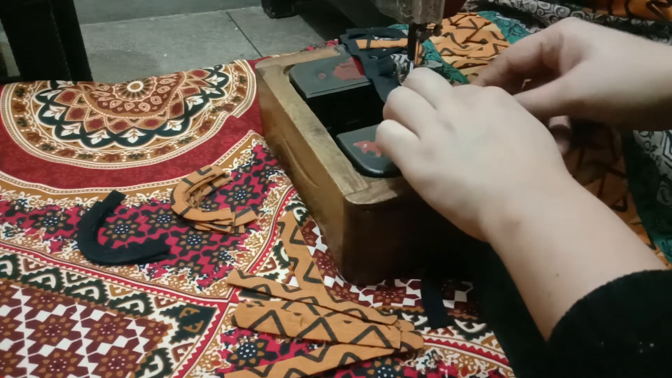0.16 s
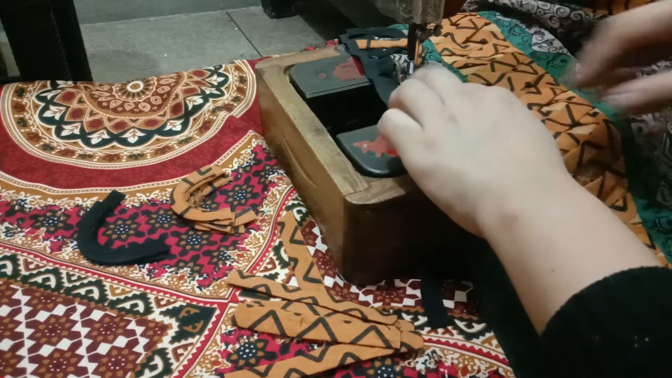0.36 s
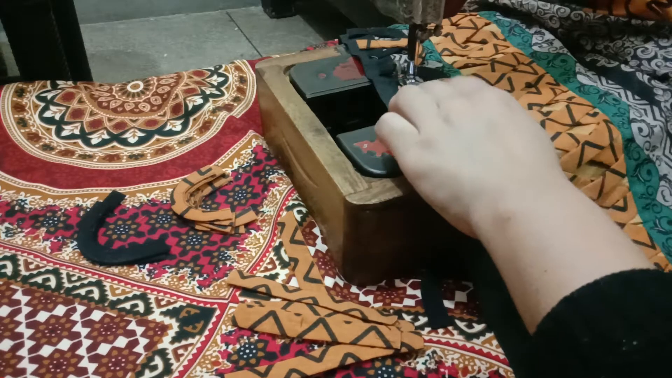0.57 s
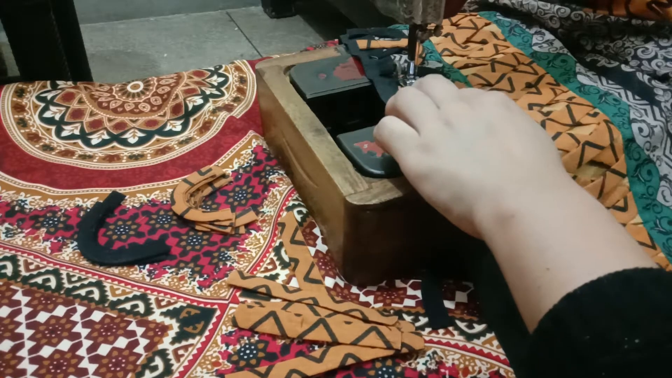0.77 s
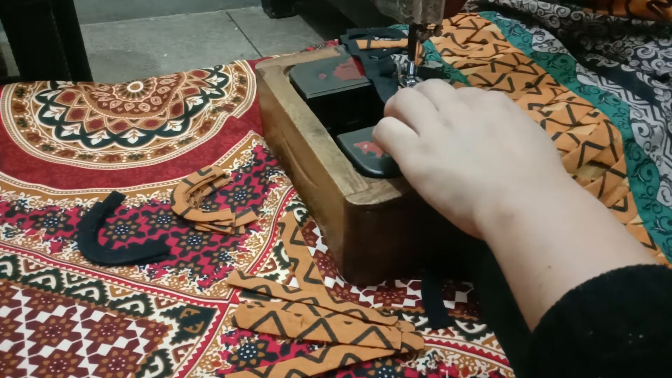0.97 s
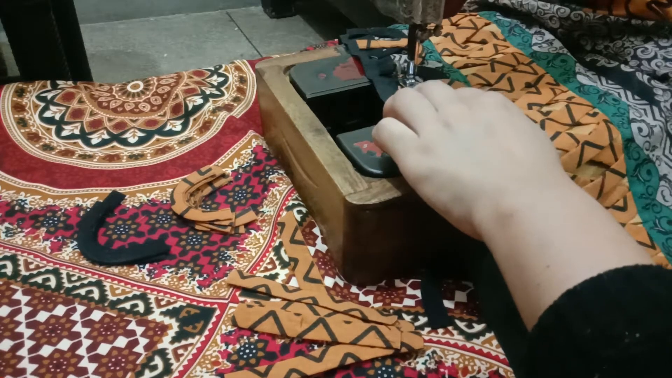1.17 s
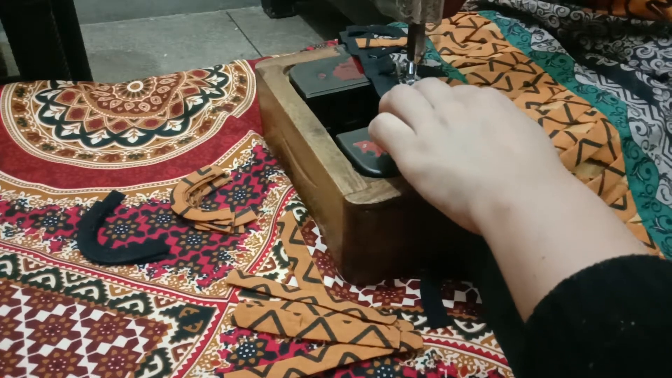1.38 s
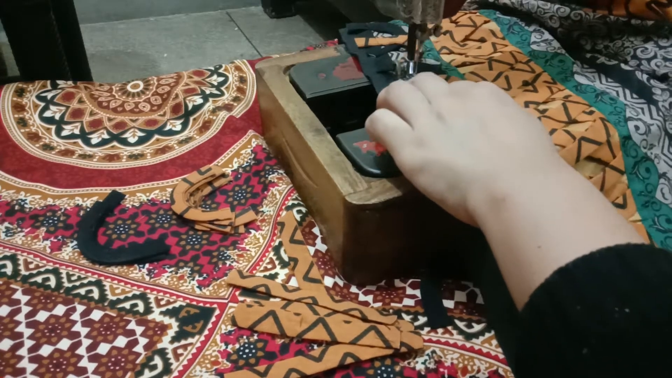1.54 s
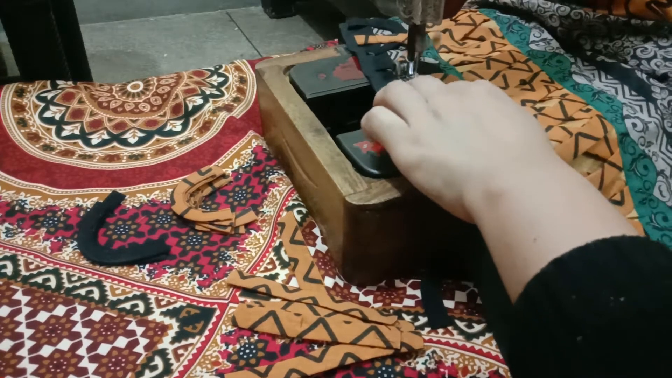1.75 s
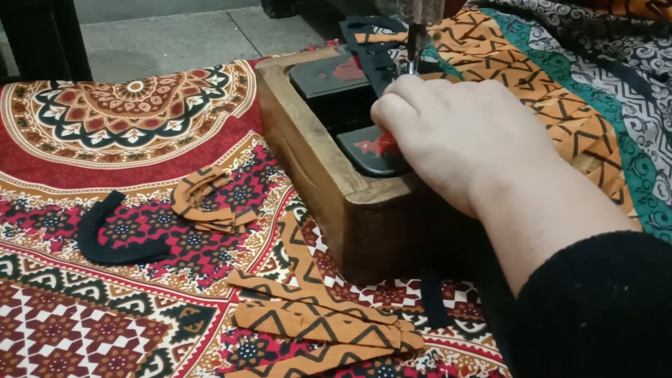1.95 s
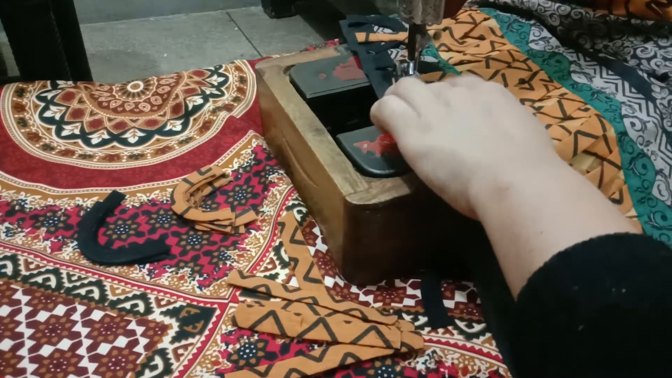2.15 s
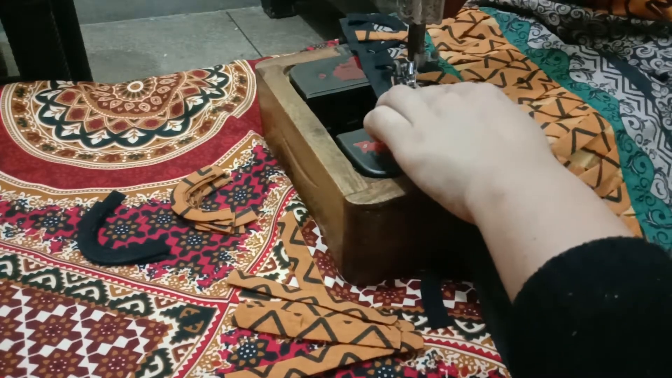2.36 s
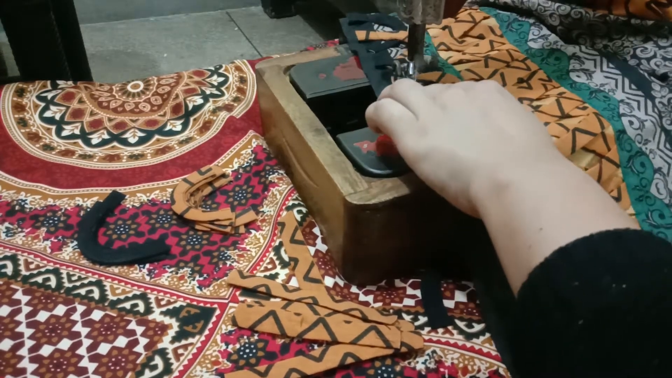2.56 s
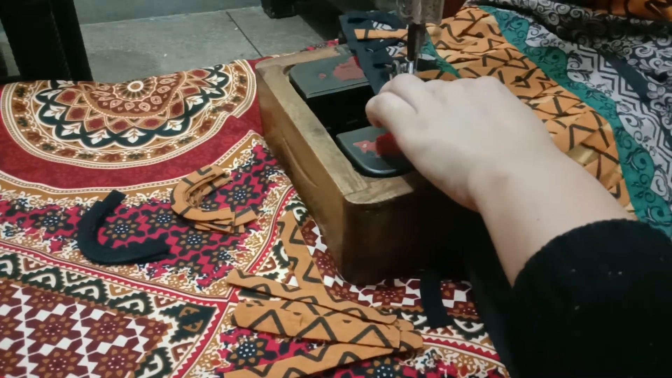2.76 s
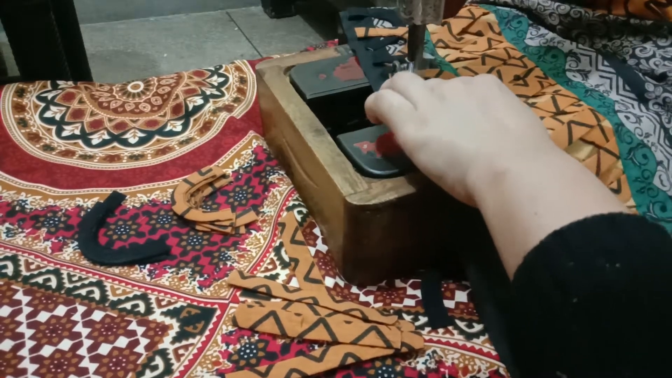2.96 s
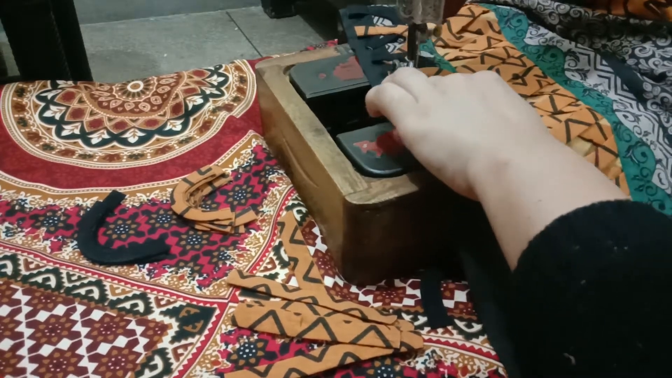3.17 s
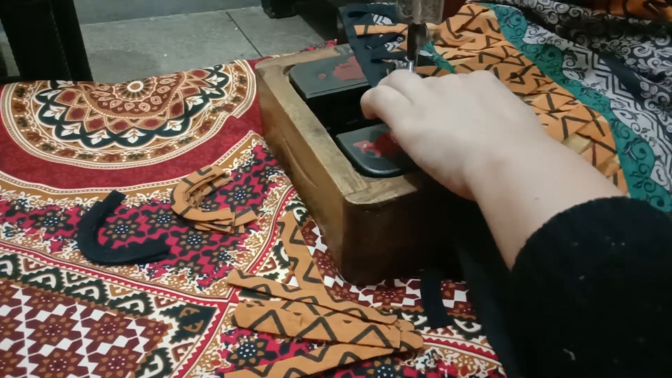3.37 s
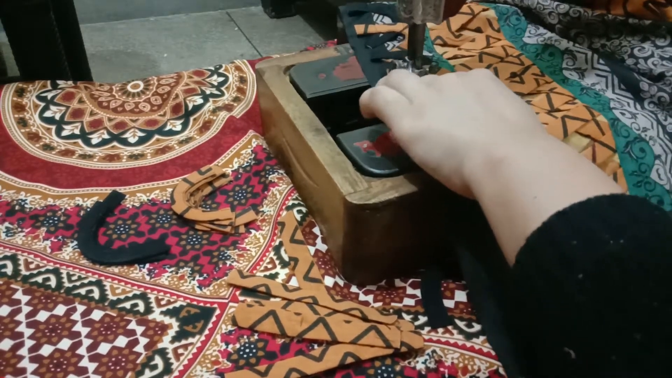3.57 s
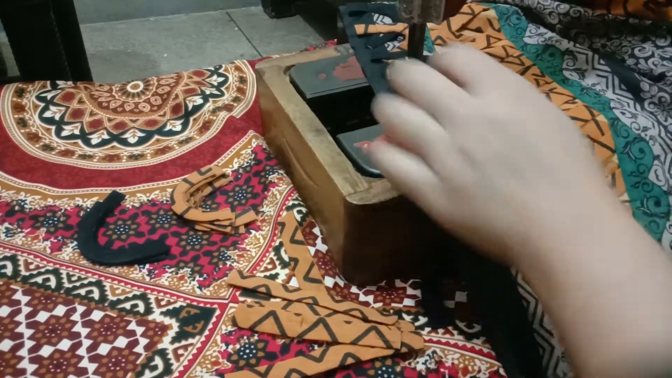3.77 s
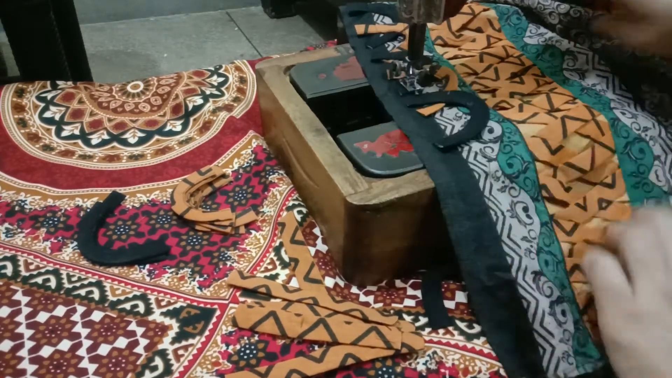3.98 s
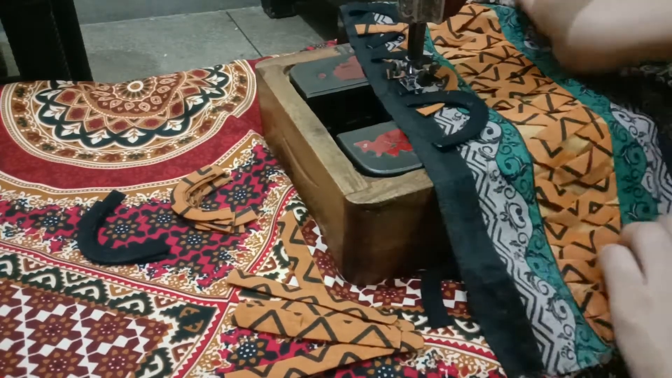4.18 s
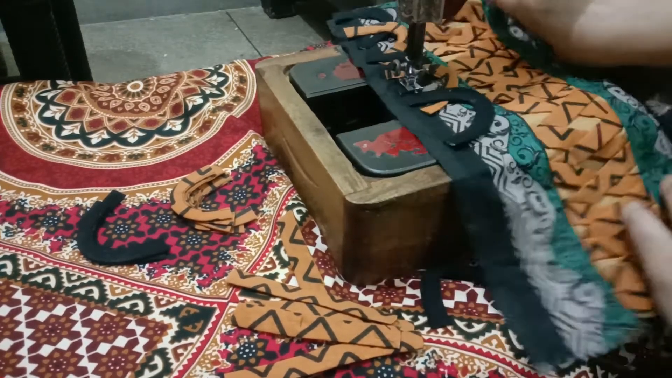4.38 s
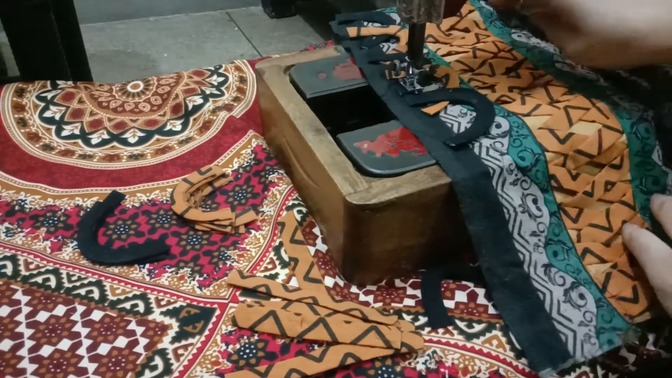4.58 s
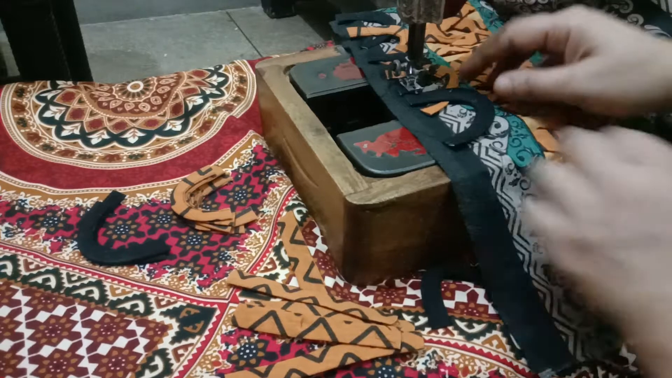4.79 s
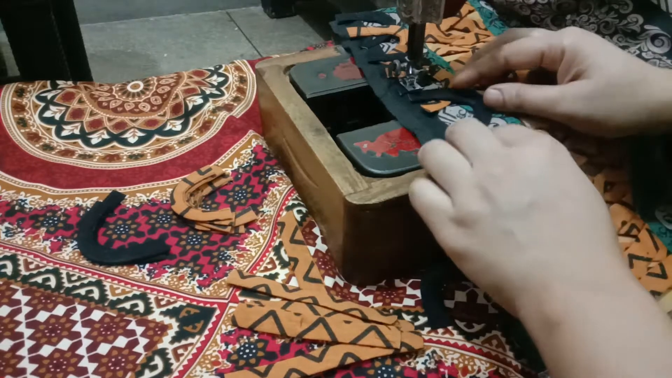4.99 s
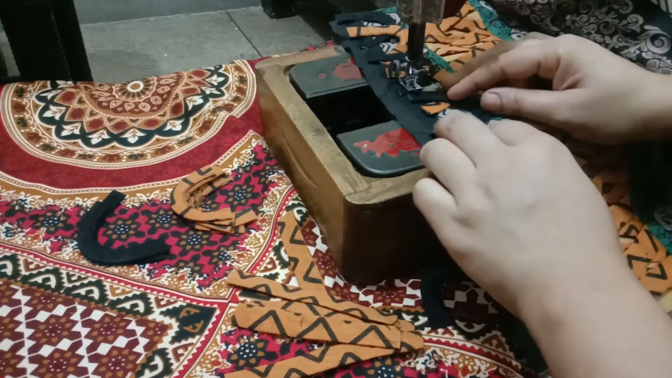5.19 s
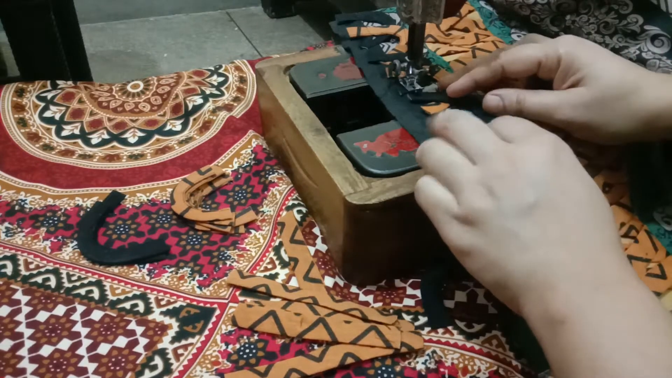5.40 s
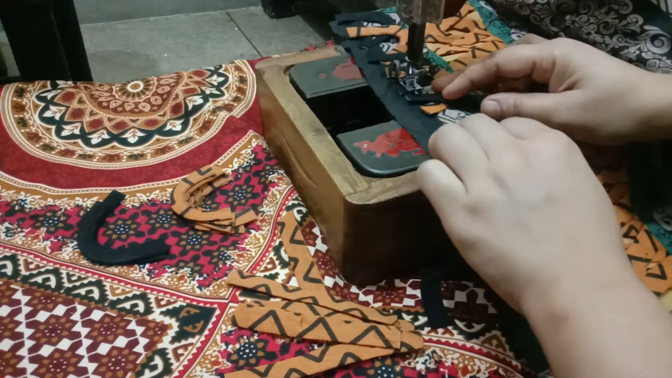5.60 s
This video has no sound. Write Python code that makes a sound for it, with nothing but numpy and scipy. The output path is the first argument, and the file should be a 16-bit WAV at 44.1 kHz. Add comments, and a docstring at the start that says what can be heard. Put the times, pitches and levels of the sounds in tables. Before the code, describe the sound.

Close, dry, nearly mono indoor sound. Quiet hiss and low rumble first, with muffled fabric movement and two quick clicks. A rubbery squeak starts the sewing machine; its rhythmic clacks quicken, slow, then quicken again after a raspy second push, with soft table thumps. After it stops, fabric is pulled with crisp rustles and scattered clicks, one sharp tap near the end, and a very faint far horn and engine hum behind.

```python
"""In a rumbling room with a far horn, an old cast-iron sewing machine stands close to a phone microphone.
Hands rustle cloth (noise and clicks) and tap the machine (short bursts) before and after the run.
A hand pushes the wheel twice, the palm squeaking on the rim (fluttering partials and rasping noise);
the machine runs up, stitches and coasts. Gritty sliding (shaken modes) lies under linkage ticks,
knocks in the wooden base and soft table thumps (struck modes)."""
import sys
import numpy as np
from scipy import signal
from scipy.fft import rfft, irfft, next_fast_len
from scipy.io import wavfile
from scipy.ndimage import uniform_filter1d

SR = 44100
rng = np.random.default_rng(int(sys.argv[2]) if len(sys.argv) > 2 else 0)


def to_wav(sig):
    """Store sig (one row per channel, or 1-D mono) as 16-bit WAV at the path in sys.argv[1].

    Samples outside -1..1 are clipped; the rate is SR.
    """
    pcm = np.clip(np.atleast_2d(sig), -1, 1) * 32767
    pcm = np.round(pcm).astype(np.int16)
    wavfile.write(sys.argv[1], SR, pcm.T)  # frames by channels


N = 248724


def undb(db):
    """Gain of a dB value."""
    return 10 ** (np.asarray(db) / 20)


def unit(x):
    """Scale to rms 1."""
    return x / np.sqrt(np.mean(x ** 2))


def noise():
    """White noise."""
    return rng.standard_normal(N)


def track(rows, column):
    """One column of a curve at every sample."""
    rows = np.array(rows)
    return np.interp(np.arange(N) / SR, rows[:, 0], rows[:, column])


def gain(rows, column, fade_s=0.0025):
    """A dB column as gain, faded at both ends and silent outside its span."""
    t = np.arange(N) / SR
    edge = np.minimum(t - rows[0][0], rows[-1][0] - t) / fade_s
    return undb(track(rows, column)) * np.clip(edge, 0, 1)


def shade(points, hz):
    """Gain of a (f/Hz, level/dB) spectrum at given frequencies."""
    points = np.array(points)
    return undb(np.interp(np.log(hz + 1), np.log(points[:, 0]), points[:, 1]))


def filtered(x, points):
    """Weight the spectrum of x by a (f/Hz, level/dB) curve."""
    size = next_fast_len(N)
    hz = np.arange(size // 2 + 1) * SR / size
    return irfft(rfft(x, size) * shade(points, hz), size)[:N]


def colour(x, points):
    """Give x a spectrum, at rms 1."""
    return unit(filtered(x, points))


def band(x, hz, width):
    """One resonance of a given width in Hz."""
    return signal.lfilter(*signal.iirpeak(hz, hz / width, SR), x)


def high(x, hz):
    """Take away what lies below hz."""
    return signal.sosfilt(signal.butter(2, hz, "high", fs=SR, output="sos"), x)


def ring(x, modes, damping):
    """Drive a set of decaying modes; damping divides their listed decay times."""
    out = 0
    for hz, db, t60 in modes:
        pole = np.exp((2j * np.pi * hz - np.log(1000) * damping / t60) / SR)
        out = out + undb(db) * signal.lfilter([1], [1, -pole], x).imag
    return out


def grit(rate, spread_db):
    """Random clicks, rate per second, whose sizes have a long tail."""
    clicks = (rng.random(N) < rate / SR) * noise()
    return unit(clicks * undb(spread_db * np.minimum(rng.exponential(size=N), 3)))


def walk(rate):
    """Random levels, rate per second, slewed from one to the next; spread 1."""
    k = int(SR / rate)
    held = np.repeat(rng.standard_normal(N // k + 1), k)
    return unit(uniform_filter1d(held, k)[:N])


def burst(t60, rise_s, size=8192):
    """A puff of noise that rises and dies."""
    t = np.arange(size) / SR
    return rng.standard_normal(size) * np.minimum(t / rise_s, 1) * 1000. ** (-t / t60)


def add(out, s, x, db):
    """Lay x into out at s with peak db."""
    i = int(s * SR)
    x = x[:N - i]
    out[i:i + len(x)] += x * undb(db) / np.abs(x).max()


def shaken(x, modes, damping, patchy_db, rate):
    """Contact points wander, so each mode swells and fades alone."""
    return unit(sum(undb(patchy_db * walk(rate)) * ring(x, [mode], damping) for mode in modes))


# wheel speed: [t/s, stitches per s]
WHEEL_SPEED = [(1.16, 1.1), (1.195, 3.5), (1.3, 4.77), (1.54, 6.87), (1.88, 4.31), (2.36, 3.04),
               (2.49, 1.6), (2.51, 3.5), (2.69, 5.3), (2.89, 8.45), (3.15, 6), (3.44, 4.17), (3.57, 1.9),
               (3.64, 0.16)]
# the hand drives the wheel: [grip t/s, release t/s]
HAND_PUSHES = [(1.19, 1.43), (2.54, 2.82)]
USUAL_SPEED = 6  # stitches per s, where speed adds nothing to a part's level
PUSH_FADE_S = 0.07  # the load comes and goes
AFTER_RISE_S, AFTER_FALL_S = 0.008, 0.085  # time constants of the shaking after a knock


def gear(law):
    """Gain of a running part: it grows with speed, changes under the hand and after each knock."""
    db, speed_db, push_db, after_db = law
    t = np.arange(N) / SR
    push = sum(np.clip(np.minimum(t - a, b - t) / PUSH_FADE_S + 0.5, 0, 1) for a, b in HAND_PUSHES)
    times = np.array(BASE_KNOCKS)[:, 0]
    latest = np.maximum(np.searchsorted(times, t) - 1, 0)
    since = np.maximum(t - times[latest], 0)
    after = (1 - np.exp(-since / AFTER_RISE_S)) * np.exp(-since / AFTER_FALL_S)
    turning = (t > WHEEL_SPEED[0][0]) & (t < WHEEL_SPEED[-1][0])
    doublings = np.log2(track(WHEEL_SPEED, 1) / USUAL_SPEED)
    return turning * undb(db + speed_db * doublings + push_db * push + after_db * after)


# hiss of the room: [f/Hz, level per Hz/dB]
ROOM_SPECTRUM = [(25, -30.5), (60, -30), (200, -24), (300, -22.5), (600, -30.5), (1200, -35.5), (2500, -39),
                 (4500, -42), (9000, -51.5), (13000, -51.5), (15600, -47)]
# low room rumble over time: [t/s, level/dB]
RUMBLE_LEVEL = [(0.0, -59.5), (0.25, -53.5), (0.4, -61), (1.1, -62.5), (3.6, -62.5), (4.05, -59),
                (4.27, -63.5), (4.5, -55.5), (4.8, -59.5)]
# two bands of the rumble: [f/Hz, width/Hz, relative level/dB]
RUMBLE_SHAPE = [(118.6, 20, 2), (165.5, 20, -4.5)]
# machine shaking the table: [level/dB, per speed doubling/dB, under the hand/dB, after a knock/dB]
TABLE_SHAKE = (-52.5, 13.5, -2.5, 15.5)
# deepest band, its own part without the share of the rumble: [f/Hz, width/Hz, level/dB]
DEEP_DRONE = (75.5, 24, -63)
# faint whines: [f/Hz, width/Hz, level/dB]
WHINES = [(1243, 45, -78), (5850, 85, -83.5)]
# far horn: [start t/s, end t/s, fundamental f/Hz, level/dB, highest multiple]
FAR_HORN = [(.51, .95, 409, -74, 10), (3.75, 3.95, 484, -74, 7)]
# resonances of the horn's bell: [f/Hz, level/dB]
HORN_BELL_SPECTRUM = [(2500, -30), (2860, -2), (3250, 1), (3690, 2), (4090, -4), (4300, -30)]
# a far engine: [f/Hz, level/dB]
ENGINE_HUM = (111, -47.5)
# its span: [start t/s, end t/s]
ENGINE_SPAN = (4.32, 4.74)


def far_horn():
    """Harmonics from the sixth up flutter separately under the bell's resonances."""
    t = np.arange(N) / SR
    out = np.zeros(N)
    for a, b, hz, db, top in FAR_HORN:
        swell = gain([(a, db), (b, db)], 1, fade_s=0.042)
        for k in range(6, top + 1):
            flutter = undb(3 * walk(80))
            out += swell * shade(HORN_BELL_SPECTRUM, k * hz) * flutter * np.sin(2 * np.pi * k * hz * t)
    return out


def far_engine():
    """A far engine hums for a moment, wavering in pitch and level."""
    (a, b), (hz, db) = ENGINE_SPAN, ENGINE_HUM
    phase = 2 * np.pi * np.cumsum(hz * (1 + 0.0257 * walk(8.0))) / SR
    return gain([(a, db), (b, db)], 1, fade_s=0.022) * undb(1.3 * walk(9.7)) * np.sin(phase)


def room():
    """Filtered noise makes hiss, rumble, a drone and two faint whines, with a far hum and horn."""
    hiss = undb(-68 + 0.75 * walk(11.0)) * colour(noise(), ROOM_SPECTRUM)
    low = unit(sum(undb(db) * unit(band(band(noise(), hz, w), hz, w)) for hz, w, db in RUMBLE_SHAPE))
    whine = sum(undb(db) * unit(band(noise(), hz, w)) for hz, w, db in WHINES)
    # the running machine shakes the table, which adds to the rumble
    rumble = undb(track(RUMBLE_LEVEL, 1) + 0.5 * walk(10.0)) + gear(TABLE_SHAKE)
    hz, width, db = DEEP_DRONE
    deep = unit(high(band(band(noise(), hz, width), hz, width), 58))
    drone = (undb(db + 2.0 * walk(2.1)) + undb(-15.5) * rumble) * deep
    return hiss + rumble * low + drone + whine + far_horn() + far_engine()


# cloth pulled: [loudest t/s, rise/s, fall/s, bright level/dB, dull level/dB, fizz level/dB]
CLOTH_PULLS = [(0.268, 0.045, 0.053, -76, -60.5, -61.5), (0.37, 0.054, 0.041, -89, -61, -88),
               (4.041, 0.038, 0.15, -57.5, -61.5, -65.5), (4.27, 0.015, 0.15, -51, -60, -60),
               (4.335, 0.043, 0.11, -47.5, -55.5, -58), (4.48, 0.039, 0.066, -59, -55, -65),
               (5.601, 0.097, 0.13, -84, -62, -76)]
# bright part of the cloth: [f/Hz, level per Hz/dB]
CLOTH_SPECTRUM = [(710, -53), (1200, -35), (1250, 12.5), (1600, 1), (2800, 8.5), (5630, 3.5), (11900, -10),
                  (15600, -0.5)]
CLOTH_EDGE_DB = -19.5  # ends of the rise and the fall, against the peak


def pull(s, rise_s, fall_s, db):
    """Gain of one pull on the cloth: up to a peak and down again."""
    edge_db = db + CLOTH_EDGE_DB
    return gain([(s - rise_s, edge_db), (s, db), (s + fall_s, edge_db)], 1)


def cloth():
    """Cloth fibres crackle: clicks over noise in bright, dull and fizzing bands."""
    fibres = grit(800, 1.9) + 1.5 * noise()
    bright = high(colour(fibres, CLOTH_SPECTRUM), 740) * undb(3.3 * walk(50))
    fizz = unit(band(band(fibres, 6540, 1600), 5800, 2300))
    dull = unit(high(band(grit(300, 1.1) + 0.5 * noise(), 334, 107), 180))
    out = np.zeros(N)
    for s, rise, fall, bright_db, dull_db, fizz_db in CLOTH_PULLS:
        rustle = undb(bright_db) * bright + undb(dull_db) * dull + undb(fizz_db) * fizz
        out += pull(s, rise, fall, 0) * rustle
    return out


# finger taps: [t/s, level/dB, centre f/Hz, width as share of centre, low part level/dB,
# tail against the tap/dB]
FINGER_TAPS = [(0.7998, -33.5, 5800, 0.21, -52, -5), (0.8133, -32, 5700, 0.22, -44, -13),
               (4.0269, -62, 6100, .4, -38.5, 0), (4.0799, -44, 5700, 0.4, -43, -13),
               (4.1334, -48, 3000, .6, -77, -4), (4.1804, -41.5, 2640, 0.19, -50, -10.5),
               (4.2565, -29.5, 6060, 0.41, -38, -16), (4.29, -41, 6000, .3, -56, -14),
               (4.3153, -33, 4020, 1, -52, -13), (4.338, -37, 5200, 0.65, -60, -20),
               (4.348, -39, 6000, .9, -58, -23), (4.363, -42, 4500, 1, -58, -23),
               (4.793, -56, 6400, 0.24, -76, -0.5), (4.967, -52.5, 4500, 0.91, -75, -20),
               (5.0057, -44, 6300, .5, -71, -18), (5.2632, -41.5, 5000, 0.36, -54, -13.5),
               (5.2913, -26.5, 4450, .9, -32, -31), (5.542, -52, 5100, .5, -68, -13),
               (5.607, -51, 5800, 0.27, -70, -15)]
# presser foot, bar and plate: [f/Hz, level/dB, decay before damping/s]
PRESSER_MODES = [(423, 2, 0.1), (860, 9.5, 0.023), (1296, 7.5, 0.058), (1830, -1, 0.044),
                 (3010, 6.5, 0.019), (3540, 10.5, 0.014), (5450, -2, .05), (6430, -1, 0.047)]


def taps():
    """A fingertip snaps on the machine, then loose parts rattle the presser's modes."""
    out = np.zeros(N)
    for s, db, hz, share, low_db, tail_db in FINGER_TAPS:
        width = share * hz
        snap = burst(0.012, 0.00028)
        contact = unit(band(band(snap, hz, width), hz, 0.98 * width))
        metal = unit(high(ring(snap, PRESSER_MODES[4:], damping=2.2), 2400))
        add(out, s, contact + 0.42 * metal, db)
        add(out, s, high(ring(burst(0.031, 0.0001), PRESSER_MODES[:3], damping=6.0), 360), low_db)
        # the rattle jumps in level every 128 samples
        rattle = burst(0.26, 0.002) * undb(2.0 * np.repeat(rng.standard_normal(64), 128))
        ringing = unit(band(ring(rattle, PRESSER_MODES[2:], damping=1.8), hz, hz))
        tail = ringing + 0.6 * unit(band(rattle, hz, width))
        add(out, s, high(tail, 430), db + tail_db)
        # the lower modes and the room answer the low part
        answer = burst(0.19, 0.013)
        modes = unit(ring(answer, PRESSER_MODES[:5], damping=2.2))
        around = unit(band(band(answer, 1280, 1900), 1240, 2400))
        add(out, s + 0.004, high(modes + 1.16 * around, 330), low_db - 8.5)
    return out


# palm on the rim, one list a squeak: [t/s, slip rate f/Hz, whistle level/dB, rasp level/dB,
# further level of partials above the second/dB]
PALM_SQUEAKS = [
    [(1.061, 1565, -50, -42, -12), (1.072, 1562, -46.5, -44.5, -8), (1.09, 1593, -38.5, -47, -1.5),
     (1.1, 1625, -42, -48, -10), (1.113, 1576, -40, -41, -10), (1.122, 1604, -54, -37, -8),
     (1.225, 1555, -64, -45.5, -6)],
    [(2.404, 1440, -68, -45, -8), (2.434, 1457, -57, -45, -3), (2.447, 1517, -52, -43.5, -1.5),
     (2.468, 1513, -46.5, -52, -2.5), (2.476, 1496, -50, -38.5, -6), (2.49, 1515, -56, -41.5, -2),
     (2.55, 1506, -62, -45, -3)],
]
# response of the wheel rim: [f/Hz, level/dB]
RIM_SPECTRUM = [(1600, -1), (3200, 1), (4570, -3), (4780, 14), (6060, 5), (6370, 4), (7560, 11),
                (7970, -11), (9060, 2), (10600, 3), (11150, -20), (12100, 7), (12750, -18), (13600, -3)]
# rough rubbing: [f/Hz, level per Hz/dB]
RASP_SPECTRUM = [(710, -72), (1200, -7.5), (3270, -15), (6110, 0.5), (8480, -10), (15000, -17.5)]
# slips locked onto one wheel mode: [start t/s, end t/s, start f/Hz, end f/Hz, level/dB]
WHEEL_LOCKS = [(1.091, 1.103, 4960, 5120, -29), (1.112, 1.148, 5160, 5000, -39.5),
               (1.11, 1.219, 6390, 6170, -43), (1.127, 1.218, 7500, 7750, -48),
               (2.403, 2.434, 5700, 5580, -43), (2.471, 2.487, 5600, 5720, -43)]


def squeaks():
    """Stick-slip: regular slips whistle in partials or lock onto a wheel mode; broken slips rasp."""
    out = np.zeros(N)
    for rows in PALM_SQUEAKS:
        hz = track(rows, 1) * (1 + 0.00516 * walk(300))
        phase = 2 * np.pi * np.cumsum(hz) / SR
        upper_db = track(rows, 4)
        stack = np.zeros(N)
        for k in range(1, 10):
            flutter = undb(0.64 * k * walk(90) + (k > 2) * upper_db)
            stack += shade(RIM_SPECTRUM, k * hz) * flutter * np.sin(k * phase + k * k)
        rasp = high(colour(noise() * (1 + 0.5 * np.cos(phase)), RASP_SPECTRUM), 1100)
        out += gain(rows, 2, fade_s=0.0016) * stack + gain(rows, 3, fade_s=0.0041) * rasp
    for a, b, hz, end_hz, db in WHEEL_LOCKS:
        glide = track([(a, hz), (b, end_hz)], 1) * (1 + 0.00397 * walk(300))
        tone = np.sin(2 * np.pi * np.cumsum(glide) / SR)
        out += gain([(a, db), (b, db)], 1) * undb(3.3 * walk(120)) * tone
    return out


# wooden base: [f/Hz, level/dB, decay before damping/s]
BASE_MODES = [(135.7, -9, .15), (342, 9.5, 0.074), (533, 13, 0.034), (681, 2.5, 0.065), (1117, -9, 0.039),
              (1217, 3, 0.043), (1930, -19, 0.083)]
# cast iron: [f/Hz, level/dB, decay before damping/s]
IRON_MODES = [(2340, 6, 0.015), (3215, -17, 0.093), (4805, -8, 0.016), (5630, -3, 0.014), (6305, -3, 0.042),
              (6765, 4, 0.021), (7230, -5, 0.053)]
# needle plate: [f/Hz, level/dB, decay before damping/s]
PLATE_MODES = [(2204, -3, 0.1), (2512, 4, 0.0583), (2564, 1.5, 0.15)]
# sliding hiss: [f/Hz, level per Hz/dB]
SLIDE_SPECTRUM = [(880, -2), (1500, -10.5), (2750, -1.5), (3130, -4.5), (4720, -9), (6520, 0), (8170, -7),
                  (11400, -17.5), (13700, -19.5), (15000, -8), (15600, -11)]
# running levels of base, hiss, plate and arm, each:
# [level/dB, per speed doubling/dB, under the hand/dB, after a knock/dB]
BASE_RUN = (-39.5, 10, 4, 5.5)
HISS_RUN = (-40.5, 9, 4.5, 5.5)
PLATE_RUN = (-55, 5, 10.5, 11.5)
ARM_RUN = (-44, 11, 4, 2)


def running():
    """Dry sliding contacts shake the base, the arm, the needle plate and the iron."""
    rough = grit(900, 0.9) + 0.5 * noise()
    grind = high(shaken(rough, BASE_MODES[1:4], damping=2.14, patchy_db=4.5, rate=25), 290)
    arm = high(shaken(rough, BASE_MODES[4:], damping=1.0, patchy_db=3.0, rate=33), 720)
    rub = grit(1200, 1.4) + 1.2 * noise()
    plate = high(shaken(rub, PLATE_MODES, damping=1.01, patchy_db=1.5, rate=21), 2100)
    iron = shaken(rub, IRON_MODES[1:], damping=0.61, patchy_db=6.5, rate=18)
    hiss = high(colour(rub, SLIDE_SPECTRUM) + undb(-10.0) * iron, 914)
    low_parts = gear(BASE_RUN) * grind + gear(ARM_RUN) * arm
    return low_parts + gear(HISS_RUN) * undb(1.4 * walk(70)) * hiss + gear(PLATE_RUN) * plate


# frame modes: [f/Hz, decay before damping/s, level/dB, per speed doubling/dB]
FRAME_MODES = [(291, 0.23, -60, 11.5), (326.9, 0.41, -59.5, 0.5), (1083, 0.088, -58, 7.5),
               (1244, 0.078, -61.5, 1.5), (6700, .02, -65, 9.5), (7380, 0.17, -64.5, 22.5)]
STRAIN_PUSH_DB = 16  # louder under the hand


def strain():
    """Narrow modes of the frame sing under the hand's load, each swelling and fading alone."""
    rough = grit(700, 2.8) + 0.4 * noise()
    out = np.zeros(N)
    for hz, t60, db, speed_db in FRAME_MODES:
        mode = shaken(rough, [(hz, 0, t60)], damping=0.7, patchy_db=1.0, rate=19)
        out += gear((db, speed_db, STRAIN_PUSH_DB, 0)) * mode
    return out


# linkage ticks: [t/s, rattle level/dB, top edge level/dB], before the trims below
LINKAGE_TICKS = [(1.252, -23.5, -25.5), (1.3587, -21, -39), (1.4574, -16, -17), (1.493, -13, -19),
                 (1.5122, -16.5, -22), (1.5311, -14.5, -17), (1.5973, -22, -21), (1.604, -17, -25),
                 (1.687, -23, -28), (1.7711, -18, -25), (1.9872, -26.5, -53), (2.269, -27, -55),
                 (2.4712, -22, -27), (2.5656, -23, -45), (2.856, -15, -32), (2.889, -16.5, -39.5),
                 (2.8916, -5, -43), (2.9, -10.5, -40), (2.939, -16, -37), (2.9716, -21.5, -18),
                 (3.005, -13.5, -16), (3.0663, -16, -21), (3.105, -20.5, -30), (3.143, -13.5, -20),
                 (3.214, -16.5, -22), (3.303, -16, -14.5)]
SLACK_PER_S, SLACK_DB = 220, -49.5  # small rattles between the louder ticks


def ticks():
    """Slack joints snap: a rattle into the iron and a very short top edge."""
    out = np.zeros(N)
    for s, db, top_db in LINKAGE_TICKS:
        rattle = ring(burst(0.021, 0.000085), IRON_MODES[2:], damping=4.1)
        add(out, s, high(rattle, 3200), db - 4.0)
        edge = band(burst(0.01, 0.0003), 15300, 2500)
        add(out, s, high(edge, 10000), top_db - 3.0)
    slack = unit(high(ring(grit(SLACK_PER_S, 1.7), IRON_MODES, damping=0.47), 2000))
    return out + gear((SLACK_DB, 6, 3.0, 0)) * slack


# knocks: [t/s, level/dB, bright edge level/dB], before the trims below
BASE_KNOCKS = [(1.278, -21.5, -34), (1.463, -22.5, -28.5), (1.61, -21, -29.5), (1.779, -23, -29),
               (1.99, -23, -29.5), (2.306, -23.5, -35), (2.708, -22, -29), (2.833, -21.5, -28),
               (2.946, -22, -27.5), (3.073, -22, -33), (3.222, -22, -29.5), (3.409, -25, -27.5)]


def knocks():
    """A blow of a few cycles, then the base rings on; metal edges give a brief crack."""
    out = np.zeros(N)
    t = np.arange(8192) / SR
    for s, db, edge_db in BASE_KNOCKS:
        push = np.exp(-((t - 0.001) / 0.00042) ** 2) + 0.37 * burst(0.02, 0.0029)
        blow = band(band(push, 640, 300), 600, 450)
        add(out, s - 0.001, blow, db + 3.5)
        wood = ring(burst(0.11, 0.0047), BASE_MODES, damping=1.2)
        add(out, s + 0.0021, high(wood, 150), db - 3.0)
        crack = ring(burst(0.064, 0.00038), BASE_MODES[-2:] + IRON_MODES[:4], damping=7.7)
        add(out, s - 0.001, high(crack, 930), edge_db + 8.0)
    return out


# the feed drops and thumps the table: [t/s, peak level/dB]
FEED_THUMPS = [(1.495, -42), (2.852, -25.5), (2.969, -27), (3.105, -29)]
# table top: [f/Hz, level/dB, decay before damping/s]
TABLE_MODES = [(124.7, -5, .25), (155, -7, 0.083)]


def thumps():
    """A soft push rings the table top."""
    out = np.zeros(N)
    t = np.arange(16384) / SR
    push = np.exp(-((t - 0.002) / 0.0017) ** 2)
    thump = -high(high(ring(push, TABLE_MODES, damping=1.1), 62), 62)
    for s, db in FEED_THUMPS:
        add(out, s, thump, db)
    return out


# faint side signal against the mid: [f/Hz, level/dB]
SIDE_SPECTRUM = [(25, -14), (60, -31), (500, -40), (1500, -33), (6000, -36), (14000, -28)]
SIDE_LAG_S = 0.023


def scene():
    """Both channels are almost alike; a filtered, delayed copy of the mid is opposite in the two."""
    hands = cloth() + taps()
    machine = running() + strain() + ticks() + knocks() + thumps()
    mid = room() + hands + squeaks() + machine
    side = filtered(np.roll(mid, int(SIDE_LAG_S * SR)), SIDE_SPECTRUM)
    return np.array([mid + side, mid - side])


SHELF_HZ, TOP_HZ = 15650, 16800  # the sound dulls above the first and ends at the second


def record(dry):
    """The treble peaks near 15.7 kHz, dulls just above and ends at 16.8 kHz."""
    dulled = dry + undb(-2.5) * band(dry, 15700, 920)
    dulled = signal.sosfilt(signal.ellip(6, 0.5, 22, SHELF_HZ, fs=SR, output="sos"), dulled)
    return signal.sosfilt(signal.ellip(10, 0.2, 70, TOP_HZ, fs=SR, output="sos"), dulled)


dry = scene()
out = record(dry)
to_wav(out)
```